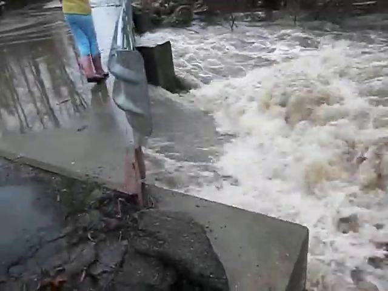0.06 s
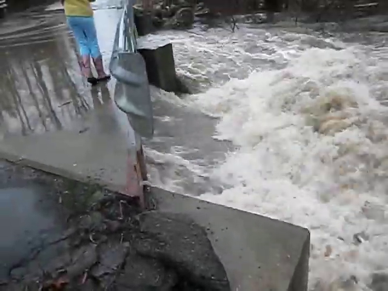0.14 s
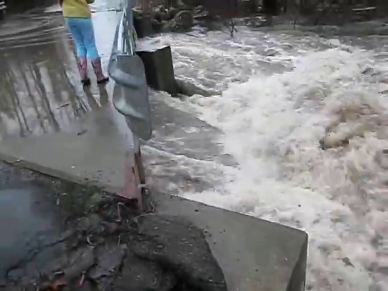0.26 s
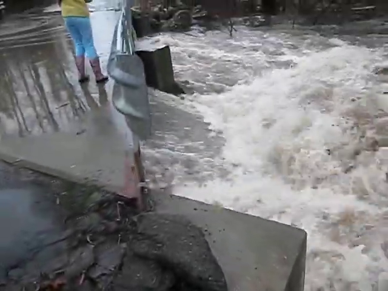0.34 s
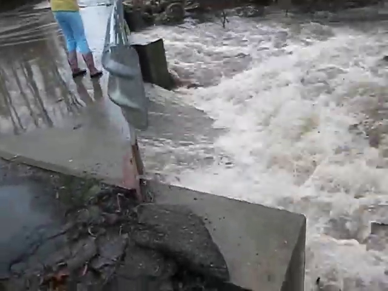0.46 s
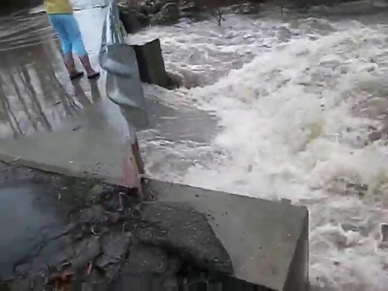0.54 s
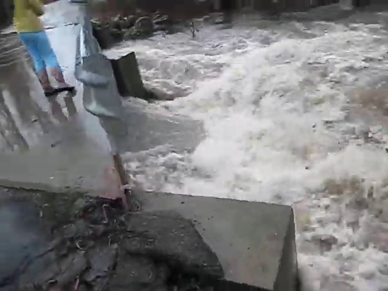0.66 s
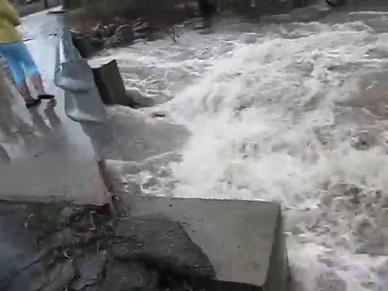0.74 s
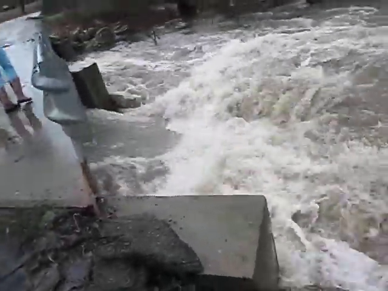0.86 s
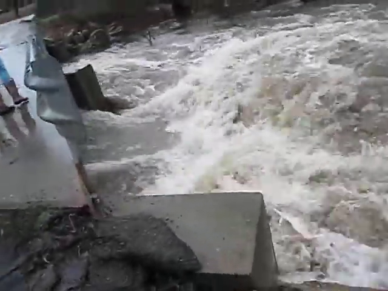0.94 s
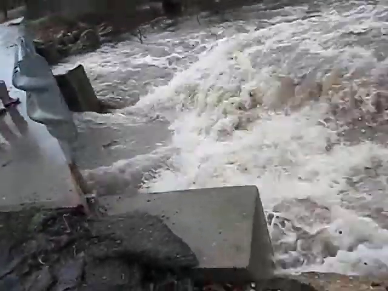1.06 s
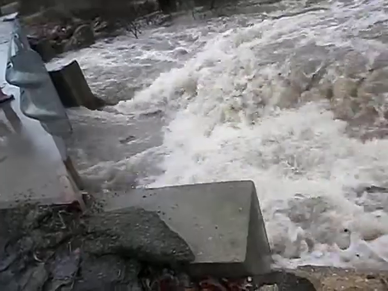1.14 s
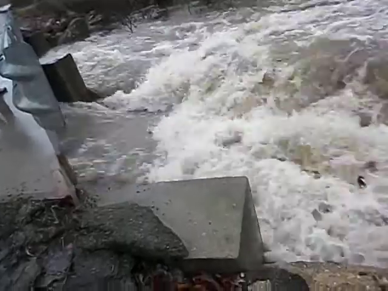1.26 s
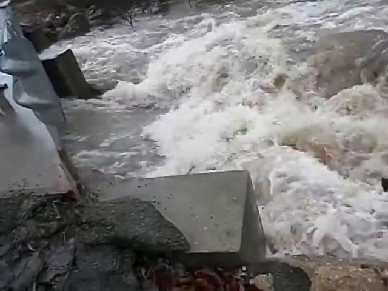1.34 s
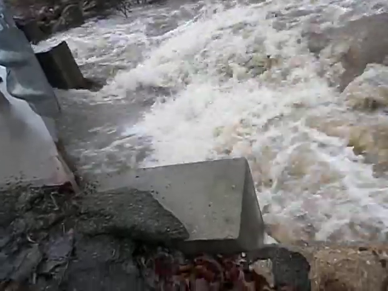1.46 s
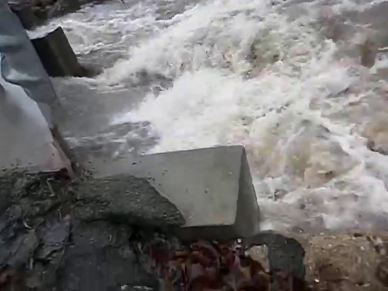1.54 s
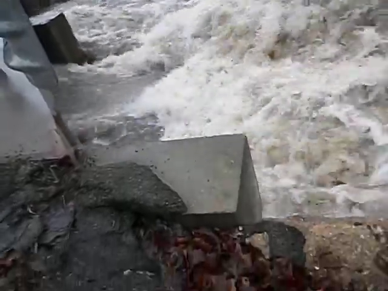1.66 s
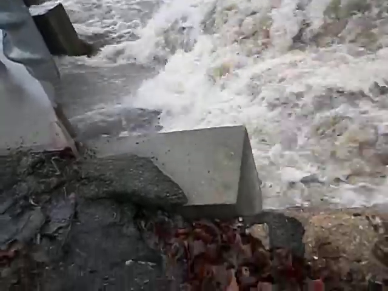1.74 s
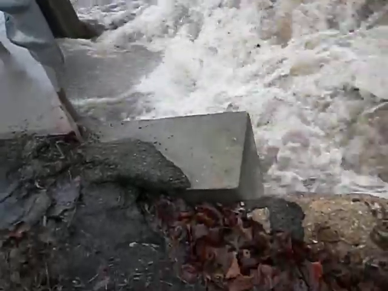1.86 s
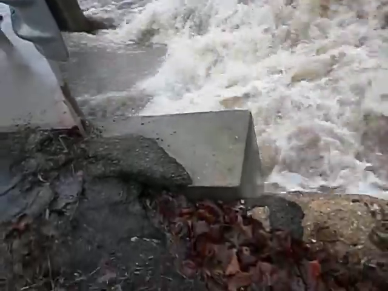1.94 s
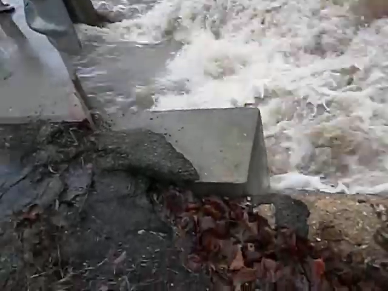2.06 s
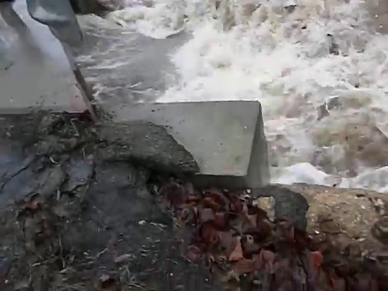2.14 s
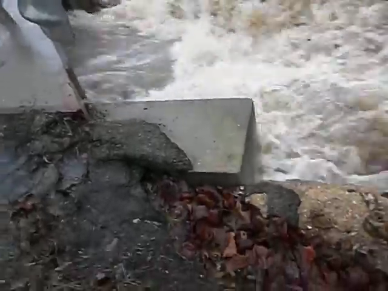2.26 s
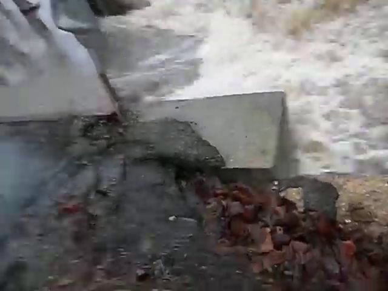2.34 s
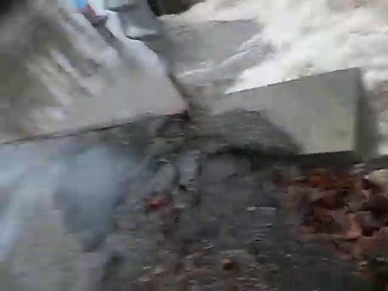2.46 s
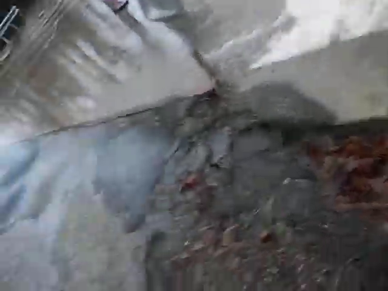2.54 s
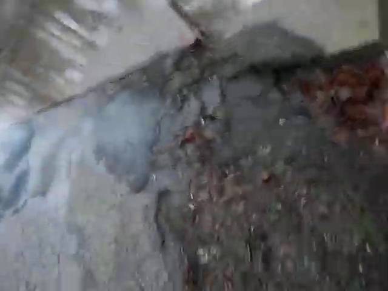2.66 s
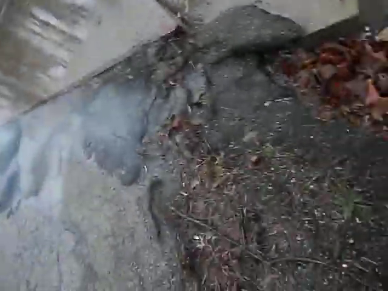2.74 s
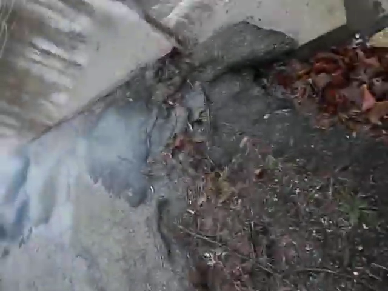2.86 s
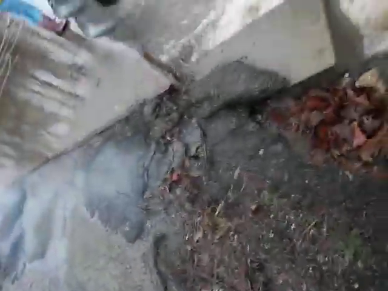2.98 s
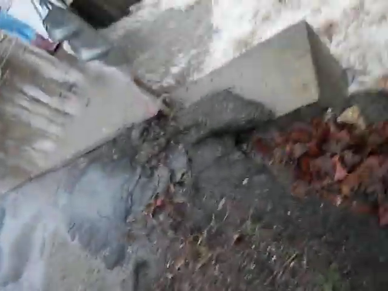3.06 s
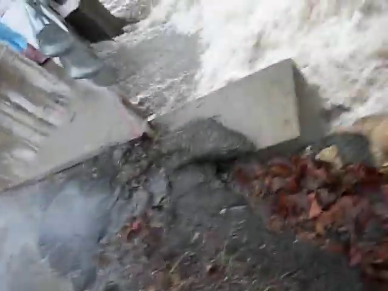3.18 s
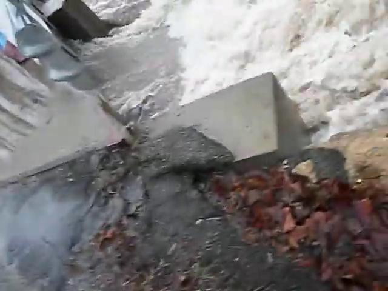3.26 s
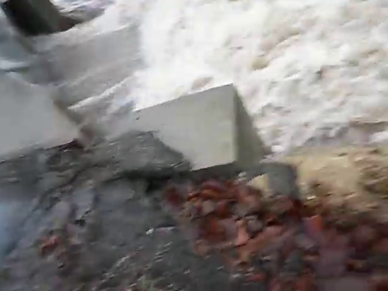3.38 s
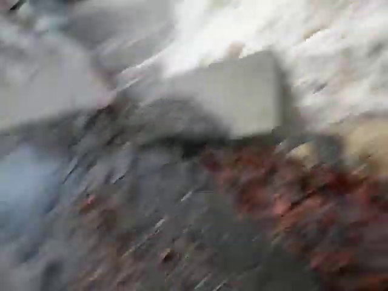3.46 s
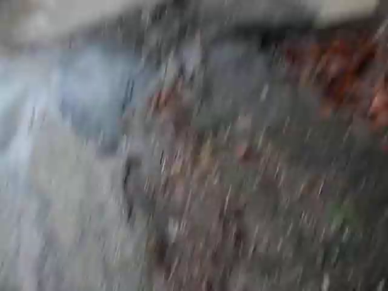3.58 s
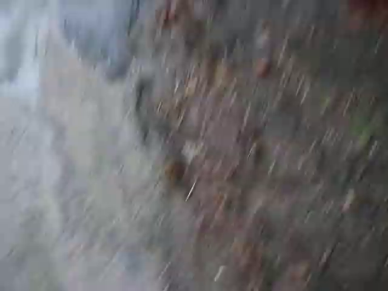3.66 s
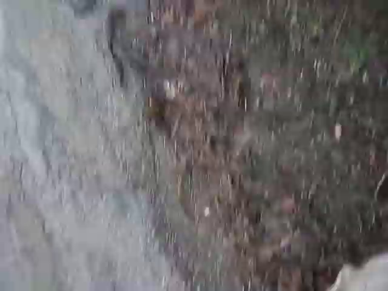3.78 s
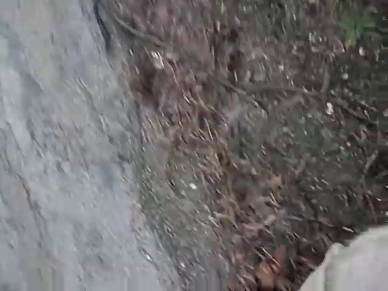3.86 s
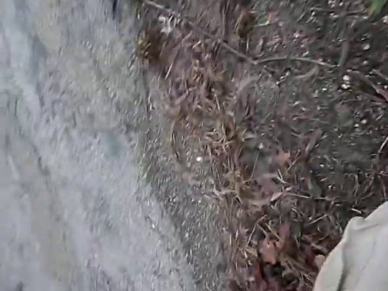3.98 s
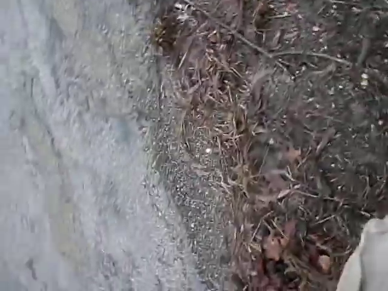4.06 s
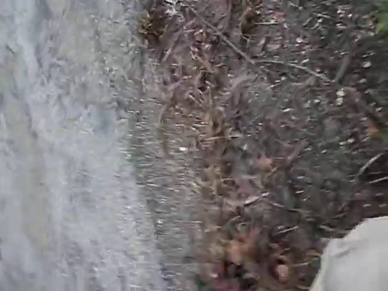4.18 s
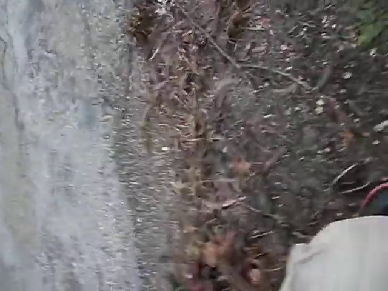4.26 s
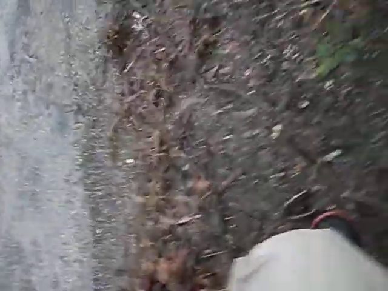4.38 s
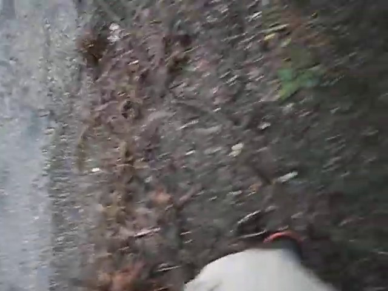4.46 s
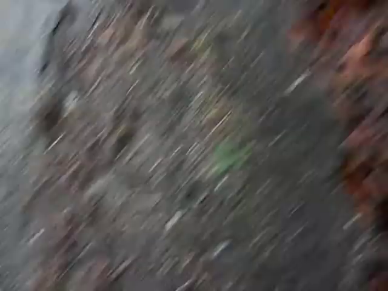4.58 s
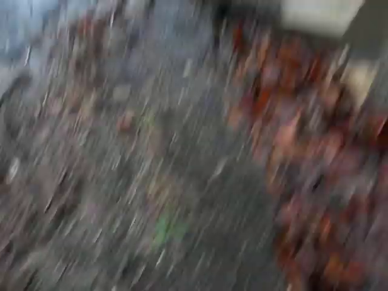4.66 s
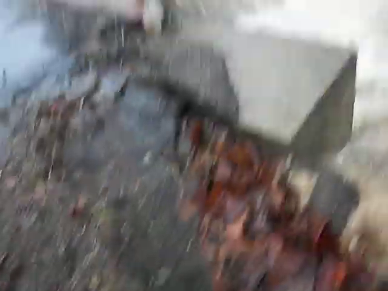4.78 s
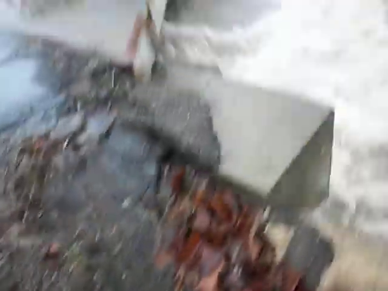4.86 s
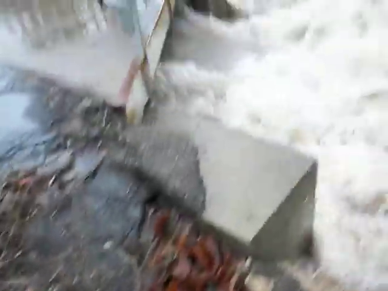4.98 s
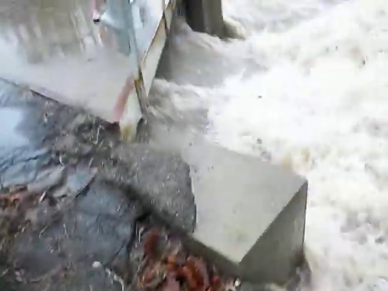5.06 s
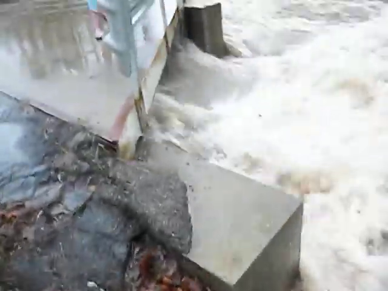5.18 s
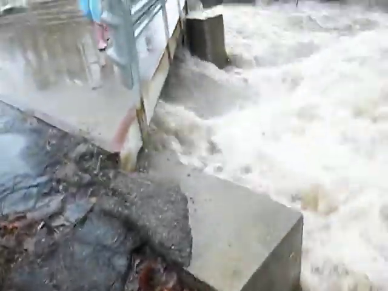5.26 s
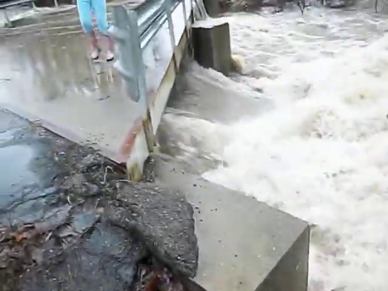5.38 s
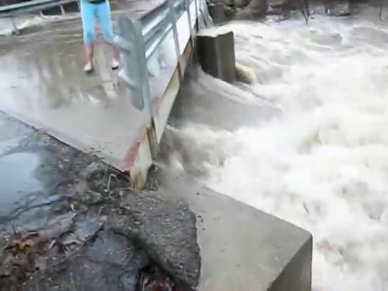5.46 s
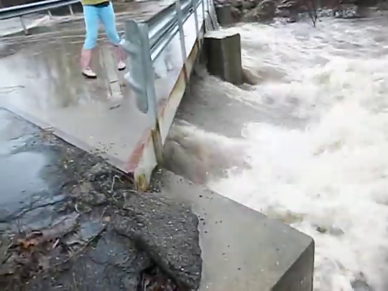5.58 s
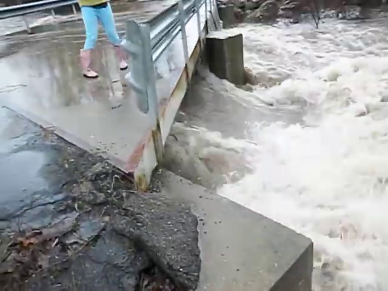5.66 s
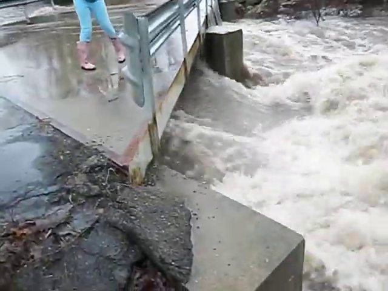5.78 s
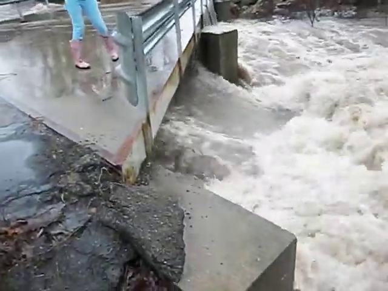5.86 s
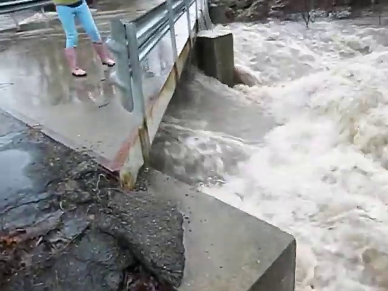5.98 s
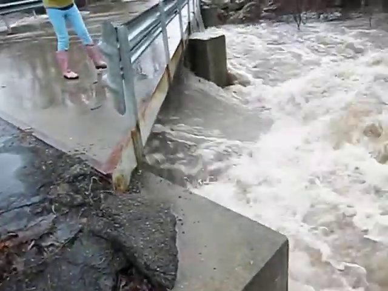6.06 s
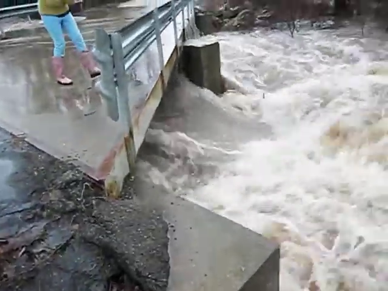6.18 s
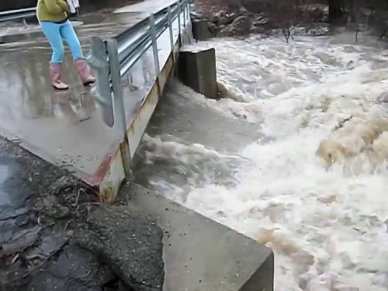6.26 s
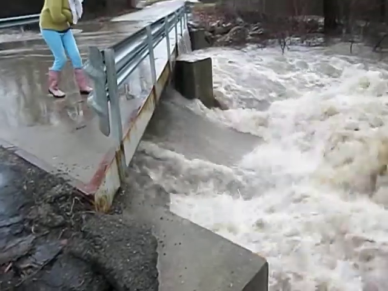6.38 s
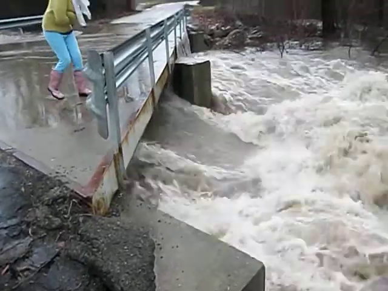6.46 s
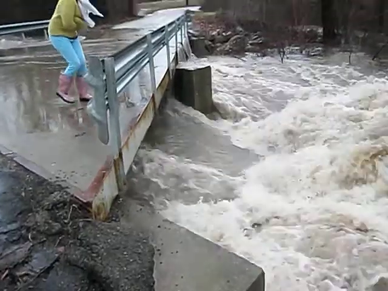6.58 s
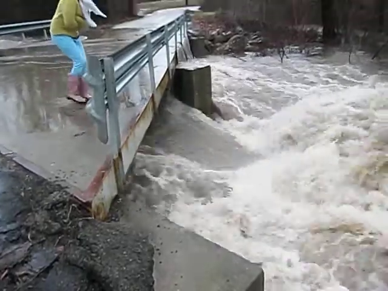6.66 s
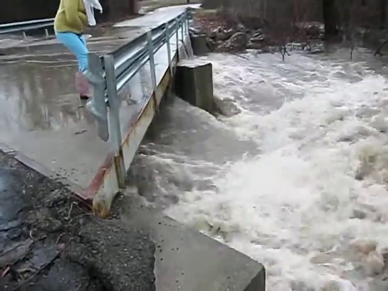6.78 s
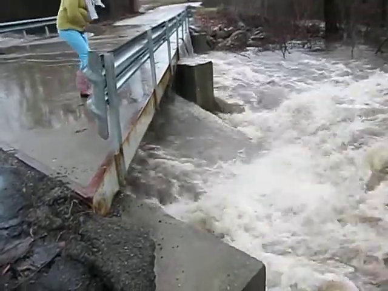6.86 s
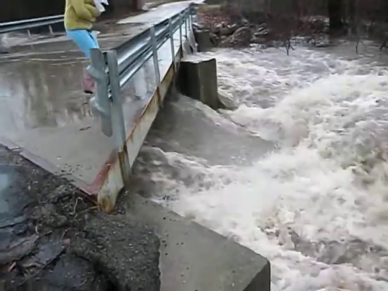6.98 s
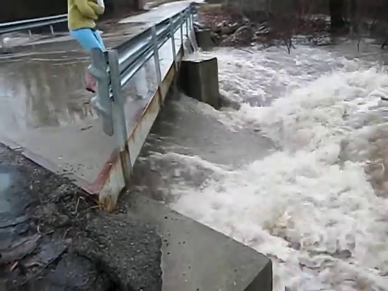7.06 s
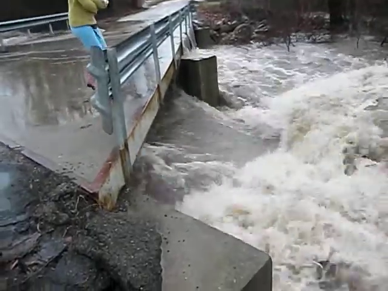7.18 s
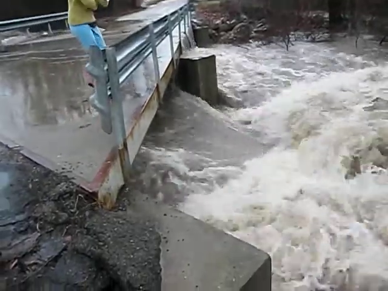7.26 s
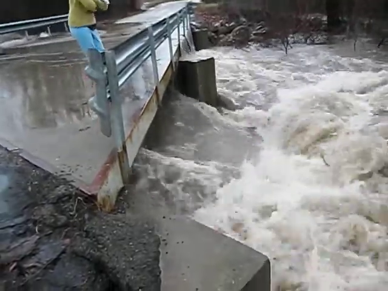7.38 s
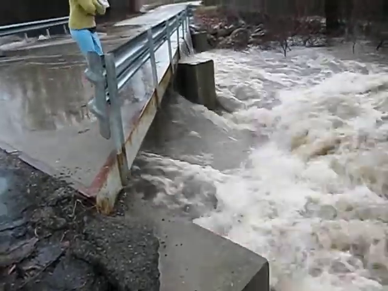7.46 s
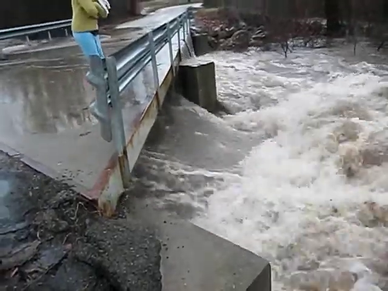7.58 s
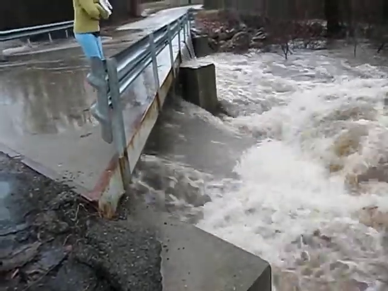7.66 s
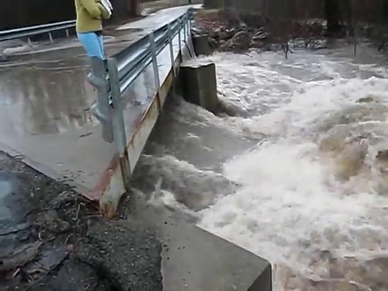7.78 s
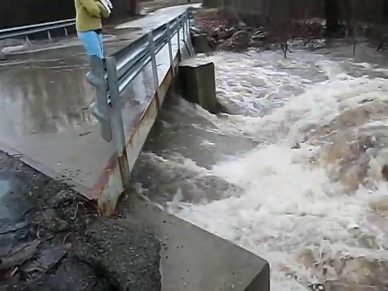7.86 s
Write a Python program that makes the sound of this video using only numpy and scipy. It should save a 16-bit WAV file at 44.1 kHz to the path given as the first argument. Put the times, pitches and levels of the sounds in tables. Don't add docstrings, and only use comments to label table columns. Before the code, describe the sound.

Loud, steady white-water flood roars close by a low concrete bridge while strong wind gusts thump, rumble and rip against a small bare microphone.

```python
import sys
import numpy as np
from scipy import signal
from scipy.fft import rfft, irfft
from scipy.io import wavfile
from scipy.ndimage import uniform_filter1d

SR = 44100
rng = np.random.default_rng(int(sys.argv[2]) if len(sys.argv) > 2 else 0)


def volts_from_decibels(level):
    exponent = np.asarray(level, float) / 20
    return 10 ** exponent


def waveform_to_disk(signal):
    frames = np.transpose(np.atleast_2d(signal))
    scaled = np.clip(frames, -1, 1) * 32767
    samples = np.round(scaled).astype(np.int16)
    wavfile.write(sys.argv[1], SR, samples)


N = 349272

# pitch_hz, density_db [dB per Hz]
WATER_SPECTRUM = [(70, -24.5), (130, 1), (320, -7), (490, -0.5), (950, -3.5), (1250, -7), (1860, -8),
                  (2400, -9.5), (4490, -11), (6100, -5), (7300, -10.5), (9500, -10)]
# time_s, body_db
WATER_BODY = [(0, -0.5), (.6, 2), (1.0, -0.5), (1.6, 1), (2.1, 0), (2.6, -1), (3.1, -2), (3.7, -2),
              (4.0, 7), (4.4, -3), (5.0, 0), (5.4, 0.5), (6.2, 2), (6.7, 1.5), (7.3, -0.5), (7.92, 1)]
# pitch_hz, density_db [dB per Hz]
WIND_SPECTRUM = [(8.8, -25.5), (15, 0), (80, -4), (405, -14), (454, -19.5), (595, -25), (655, -21),
                 (1500, -46), (1950, -79), (3300, -120)]
# time_s, level_db
STEADY_WIND = [(0.0, -22), (1.48, -23.5), (1.85, -15.5), (3.0, -19.5), (3.2, -24), (3.46, -25),
               (3.66, -16.5), (4.19, -18.5), (4.48, -14), (4.7, -21), (4.92, -26.5), (5.05, -17.5),
               (5.87, -20), (5.98, -22), (6.46, -17.5), (6.75, -25.5), (7.1, -17), (7.92, -23.5)]
# centre_s, peak_db, wake_db [swell of rumble]
JOLTS = [(0.894, -1.5, -12), (1.126, -3, -10), (1.152, 0, -11), (1.738, -8, -25), (1.791, -9.5, -7),
         (2.01, -3, -26), (2.031, 1, -31), (2.114, -6, -26), (2.243, -1, -14.5), (2.509, -1.5, -23),
         (2.663, -0.5, -17.5), (2.759, -4.5, -16), (2.895, -1, -17), (2.92, -.5, -17.5), (3.756, 2.5, -5),
         (3.838, -5, -20), (3.947, 1.5, -18), (4.022, 4, -19), (4.071, 2, -16.5), (4.095, 3.5, -18),
         (4.153, -0.5, -8), (4.922, -0.5, -16), (5.272, -1, -23), (5.675, -4.5, -18.5),
         (5.856, -3.5, -18.5), (6.394, -5.5, -27), (6.627, -5, -14), (6.906, -1.5, -13.5),
         (7.19, -0.5, -16.5), (7.902, 3, -21.5)]
# centre_s, peak_db, wake_db, width_ms
SHOVES = [(0.177, -9.6, -18, 3.4), (1.67, -14, -16.5, 14), (1.894, -11, -30, 3.8), (1.978, -5, -23, 2.5),
          (2.431, 4.5, -17, 8.6), (2.944, 1.5, -15.5, 4.7), (2.984, 1, -11.5, 8.1), (3.05, 1, -22, 16),
          (3.131, -5, -26, 12.4), (4.242, -14, -19, 12), (4.275, -2, -34, 5.5), (4.296, -6.5, -33, 3.6),
          (4.336, -13, -31, 4.3), (4.45, -18, -18, 7.9), (4.568, -14, -25, 3), (4.602, -2, -23, 4.9),
          (4.72, -7, -21.5, 2.3), (4.965, -5.5, -15, 5.2), (5.085, -6, -16.5, 6.3),
          (5.197, -2.5, -18.5, 2.7), (5.642, -3, -21.5, 2.8), (5.994, -1.5, -6, 5.2),
          (6.326, -5.5, -8.5, 4.9), (6.516, -8, -18, 4.9), (6.702, -4.5, -18, 2.7), (6.74, -8.5, -14, 2.8),
          (6.84, -12, -12.5, 3.4), (6.99, -9.5, -15.5, 2.4), (7.172, 2.5, -7.5, 5.4),
          (7.429, -13.5, -21.5, 21)]
# centre_s, level_db, brightness_db, length_ms
TEARS = [(1.676, -13, 3, 6.7), (2.206, -11, -9.5, 4.8), (2.261, -12, -18, 4.7), (2.49, -14, -13, 4.4),
         (2.508, -11.5, -37, 4.7), (2.558, -15.5, -17, 3.7), (2.679, -11.5, -16.5, 5.2),
         (2.722, -12, -28, 5), (2.756, -17.5, -12, 10), (2.896, -15, -21, 15), (2.94, -16, -30, 6.4),
         (3.857, -3, -13.5, 3.2), (3.952, -9, -7.5, 3.1), (3.987, -12, -27.5, 6.1), (4.025, -13.5, -5, 5.9),
         (4.065, -14.5, -6.5, 14), (4.102, -8, -10.5, 9.3), (4.122, -13, -6.5, 13),
         (4.151, -9.5, -11.5, 4.2), (4.194, -15.5, -11.5, 4.5), (4.234, -22, -6, 6.6),
         (4.288, -14.5, -32, 6.7), (4.33, -14, -12, 10.6), (4.407, -17.5, -38, 11), (4.468, -15, -9, 19),
         (4.496, -17, -8.5, 11.4), (4.585, -17, -32, 10), (4.645, -20, -25, 8), (5.266, -12.5, -18, 13),
         (7.18, -8.5, -11.5, 8)]
# centre_s, level_db, brightness_db
RIPS = [(1.152, -21, -10), (2.034, -17, -13), (2.138, -15, -6), (2.239, -11, -18), (2.397, -17, -10),
        (2.432, -14.5, -8), (2.827, -26, -15), (2.923, -23, -7), (3.06, -27, -14), (3.763, -12, -17),
        (3.795, -14.5, -20), (3.814, -19, -30), (3.967, -14.5, -20), (4.085, -15.5, -26), (4.177, -26, -12),
        (4.217, -26, -14), (4.265, -24, -16), (4.375, -31, -11), (4.422, -26, -13), (4.446, -24, -20),
        (4.525, -18.5, -30), (4.558, -20, -11), (4.6, -26, -14), (4.723, -21, -21), (5.674, -10, -22),
        (5.88, -9.5, -15), (6.004, -23, -10), (6.384, -13.5, -16), (7.662, -15, -17), (7.895, -9, -12)]
# start_s, peak_db, pitch_hz, t60_s
HOUSING_TICK = (2.4613, 1.5, 3400, .0022)
# time_s, gain_left_db
GUST_DUCKS = [(0.34, -23.5), (0.87, -21), (1.051, -22), (1.168, -27), (1.681, -24.5), (1.99, -26.5),
              (2.091, -28), (2.268, -31), (2.441, -31.5), (2.51, -34.5), (2.68, -35.5), (2.779, -35.5),
              (2.952, -41.5), (3.128, -37.5), (3.772, -33), (3.862, -36), (3.962, -38.5), (4.129, -47),
              (4.301, -44.5), (4.488, -42), (5.042, -23), (5.2, -26), (5.279, -30.5), (5.678, -28),
              (5.872, -29.5), (6.0, -31), (6.33, -27.5), (6.419, -26.5), (6.64, -24.5), (7.2, -30)]
# time_s, gain_left_db
MORE_DUCKS = [(0.122, -22), (0.22, -22.5), (0.619, -22), (0.701, -21), (0.93, -22), (1.1, -23.5),
              (1.521, -21.5), (1.8, -23), (1.91, -22.5), (2.045, -29.5), (4.035, -40), (7.3, -26.5),
              (3.55, -21.5), (3.7, -22), (5.12, -22.5), (5.52, -22.5), (5.622, -22.5), (6.28, -22),
              (6.545, -23.5), (6.69, -25), (6.74, -25), (6.855, -23), (6.91, -24.5), (7.056, -21.5),
              (7.55, -22), (7.652, -24), (7.77, -22.5), (7.86, -23), (7.905, -27)]
# pitch_hz, gain_db
ROLL_OFF = [(7200, 0.5), (7600, -5), (8000, -16.5), (8450, -17), (9000, -33.5)]

JOLT_MS, RIP_MS, WAKE_S = 1.68, 6.7, 0.014
OPEN_GAIN_DB, FALL_DB_PER_S, RECOVER_DB_PER_S = -19, 299.5, 45
SAMPLING_HZ = 16000


def evened(x):
    return x / np.sqrt(np.mean(x ** 2) + 1e-20)


def read(points, hz):
    f, value = np.transpose(points)
    return np.interp(np.log(hz + 1), np.log(f + 1), value)


def add(mix, s, sound):
    part = mix[max(round(s * SR), 0):][:len(sound)]
    part += sound[:len(part)]


def band(x, lo_hz, hi_hz):
    return signal.sosfilt(signal.butter(2, [lo_hz, hi_hz], "band", fs=SR, output="sos"), x)


def lumps(per_s):
    return evened(band(rng.standard_normal(N), per_s / 8, per_s))


def noise(spectrum, patchy_db):
    frames, hz = N // 512 + 5, np.fft.rfftfreq(2048, 1 / SR)
    a, b, patches = rng.standard_normal((frames, len(hz), 3)).T
    patches = uniform_filter1d(patches, size=20, axis=0)
    patches = evened(uniform_filter1d(patches, size=6, axis=1))
    level_db = read(spectrum, hz)[:, None] + patchy_db * patches
    return signal.istft((a + 1j * b) * volts_from_decibels(level_db), nperseg=2048, noverlap=1536)[1][:N]


def rapids():
    roar = noise(WATER_SPECTRUM, patchy_db=1.0)
    roar /= np.std(band(roar, 5000, 7600))
    body = signal.sosfiltfilt(signal.butter(1, 2200, fs=SR, output="sos"), roar)
    swell_db = np.interp(np.arange(N) / SR, *np.transpose(WATER_BODY))
    heave = volts_from_decibels(swell_db + 0.56 * lumps(3.1))
    flicker_db = 0.55 * lumps(40)
    return volts_from_decibels(flicker_db - 0.62) * (roar - body + heave * body)


def eddies():
    return SHOVES + [(*row, JOLT_MS) for row in JOLTS]


def gust_db():
    t = np.arange(0, N + 64, 64) / SR
    at, _, wake_db, _ = np.transpose(eddies())
    wakes = volts_from_decibels(wake_db) * np.exp(-((t[:, None] - at) / WAKE_S) ** 2)
    steady = volts_from_decibels(np.interp(t, *np.transpose(STEADY_WIND)))
    return np.interp(np.arange(N) / SR, t, 20 * np.log10(steady + wakes.sum(axis=1)))


def gain_db():
    s, db = np.transpose(GUST_DUCKS + MORE_DUCKS)
    t = np.arange(0, N + 64, 64) / SR
    since = t[:, None] - s
    ducked = (db + np.maximum(RECOVER_DB_PER_S * since, -FALL_DB_PER_S * since)).min(axis=1)
    return np.interp(np.arange(N) / SR, t, np.minimum(ducked, OPEN_GAIN_DB))


def tick():
    s, db, hz, t60 = HOUSING_TICK
    out, t = np.zeros(N), np.arange(400) / SR
    add(out, s, volts_from_decibels(db - 60 * t / t60) * np.sin(2 * np.pi * hz * t))
    add(out, s, volts_from_decibels(-9 - 60 * t / 0.006) * np.sin(2 * np.pi * 2550 * t))
    return out


def rumble():
    low = evened(noise(WIND_SPECTRUM, patchy_db=2.5))
    low /= (uniform_filter1d(low ** 2, size=1500) + 0.1) ** 0.14
    return volts_from_decibels(gust_db() - 4.0 + 3.04 * lumps(40)) * evened(low)


def crackle():
    strength = np.clip((gust_db() - gain_db() - 17) / 12, 0, 1)
    size = volts_from_decibels(6.6 * np.minimum(rng.exponential(size=N), 4)) * rng.choice([-1., 1.], N)
    struck = rng.random(N) < 500 / SR
    return volts_from_decibels(gust_db() - 19.5) * strength * evened(band(size * struck, 460, 1500))


def tears():
    out, ms = np.zeros(N), np.arange(-1000, 1000) * 1000 / SR
    rows = TEARS + [(*row, RIP_MS) for row in RIPS]
    draws = rng.standard_normal((len(rows), 2, len(ms)))
    for (s, db, bright_db, length_ms), (grain, clumps) in zip(rows, draws):
        ragged = grain * volts_from_decibels(6.2 * evened(uniform_filter1d(clumps, size=30)))
        dull = band(band(ragged, 140, 860), 120, 1900)
        window = np.exp(-(ms / (0.69 * length_ms)) ** 2)
        burst = (dull + volts_from_decibels(bright_db - 3.5) * band(ragged, 1200, 2560)) * window
        burst *= np.linalg.norm(window) / np.linalg.norm(burst)
        add(out, s + ms[0] / 1000, volts_from_decibels(db - 0.8) * burst)
    return out


def thumps():
    out, ms = np.zeros(N), np.arange(-1000, 1000) * 1000 / SR
    for (s, db, _, width_ms), chance in zip(eddies(), rng.random(len(eddies()))):
        push = np.exp(-(abs(ms) / (0.52 * width_ms)) ** 3.6)
        add(out, s + ms[0] / 1000, volts_from_decibels(db - 1.1) * np.sign(chance - 0.5) * push)
    return signal.lfilter(*signal.butter(1, 30, "high", fs=SR), out)


def scene():
    wind = rumble() + thumps() + tears() + crackle() + tick()
    return (rapids() + wind / volts_from_decibels(gain_db()))[None]


def roll_off(x):
    return signal.sosfilt(signal.butter(12, 9060, fs=SR, output="sos"), x)


def record(dry):
    hz = np.fft.rfftfreq(N, 1 / SR)
    overloaded = np.clip(dry * volts_from_decibels(gain_db()), -0.93, 0.93)
    sampled = irfft(rfft(overloaded) * (hz < SAMPLING_HZ / 2), N)
    mirrored = sampled * (1 + 2 * np.cos(2 * np.pi * SAMPLING_HZ * np.arange(N) / SR))
    rolled = irfft(rfft(mirrored) * volts_from_decibels(read(ROLL_OFF, hz)), N)
    low_pass = signal.firwin(1601, 9100, window=("kaiser", 10), fs=SR)
    narrow = signal.oaconvolve(rolled, low_pass[None], "same")
    return roll_off(np.clip(narrow, -1, 1))


dry = scene()
out = record(dry)
waveform_to_disk(out)
```